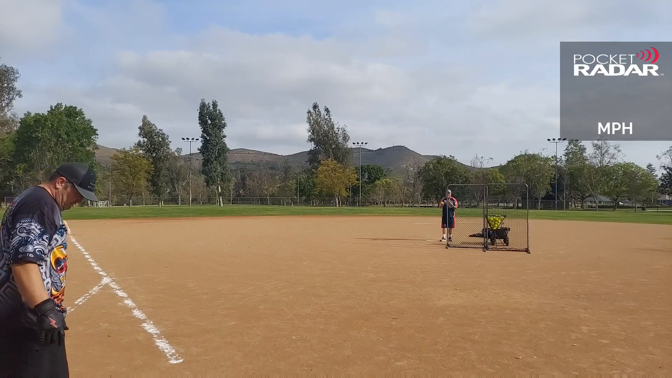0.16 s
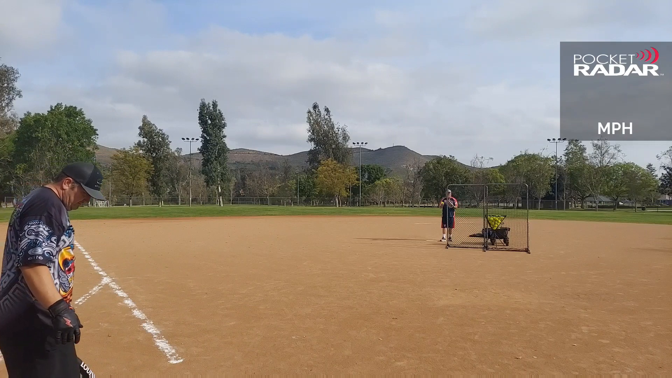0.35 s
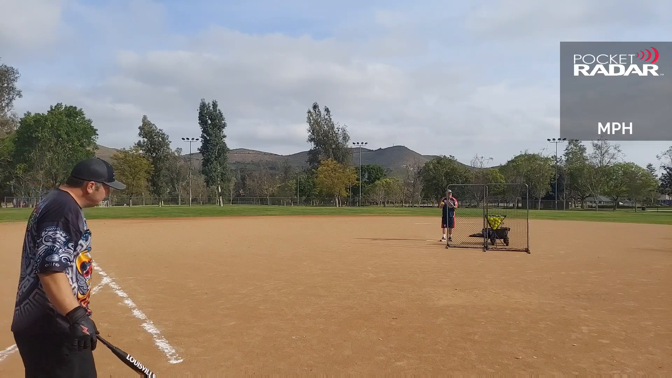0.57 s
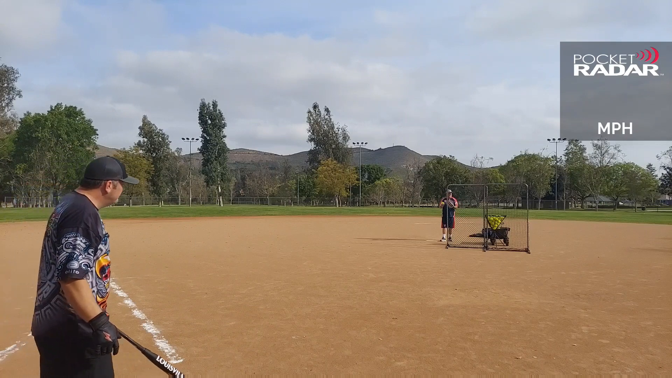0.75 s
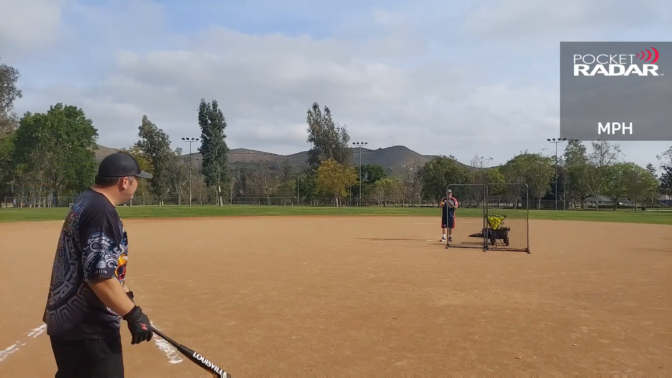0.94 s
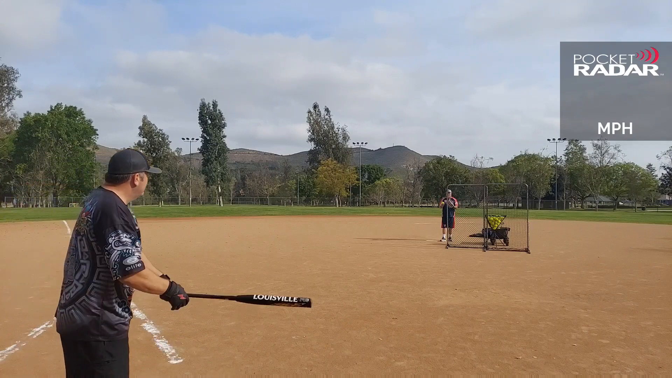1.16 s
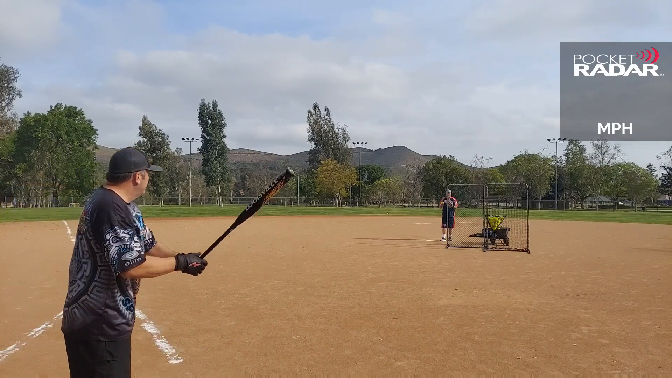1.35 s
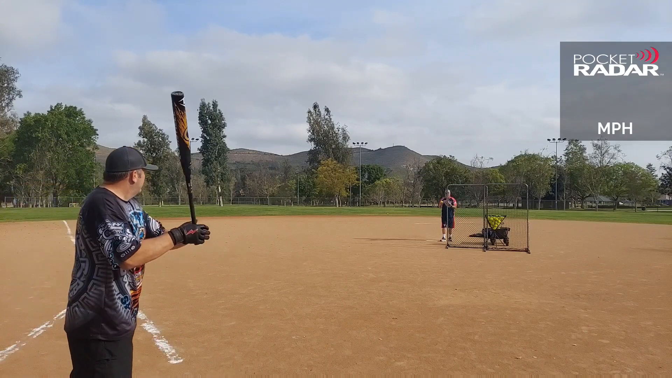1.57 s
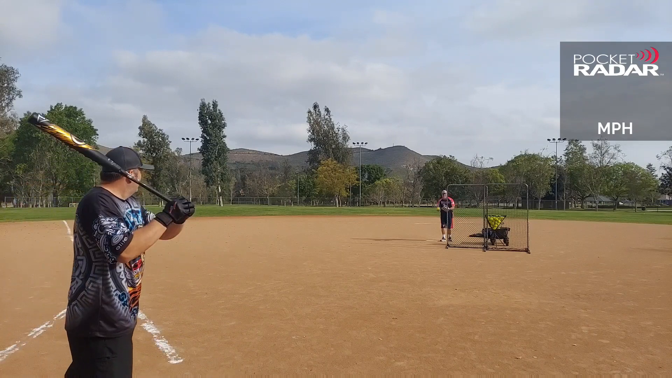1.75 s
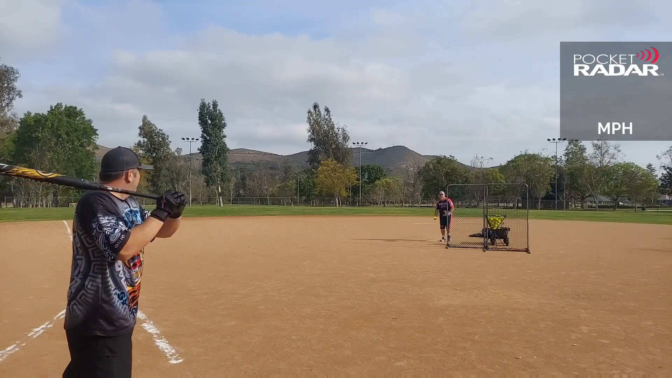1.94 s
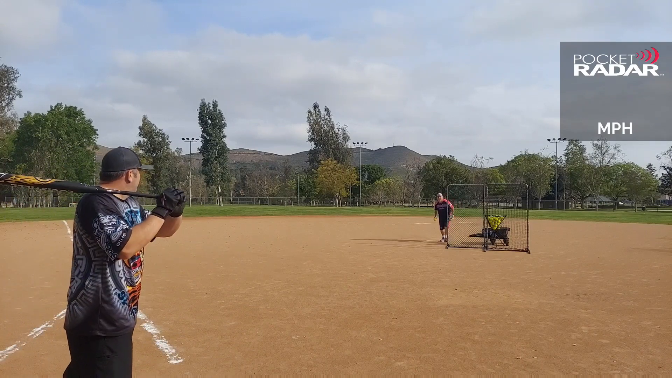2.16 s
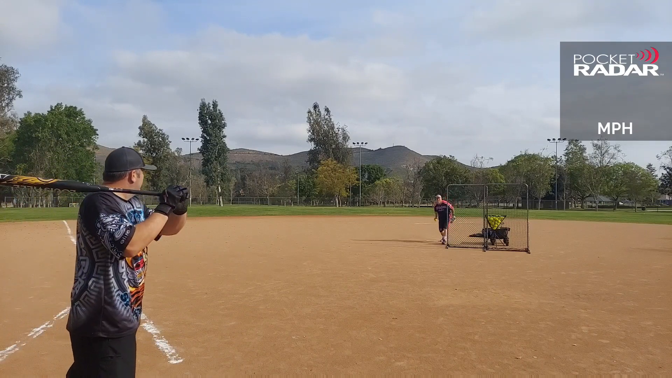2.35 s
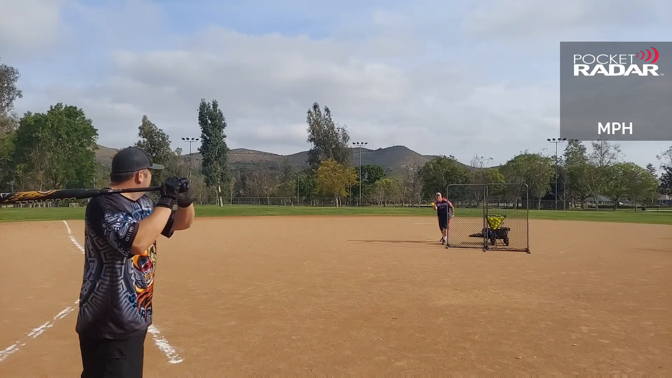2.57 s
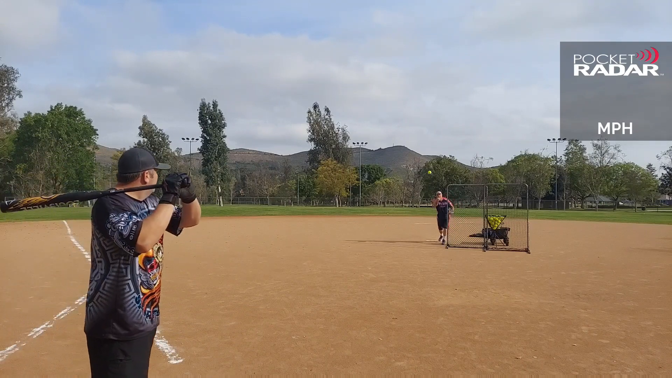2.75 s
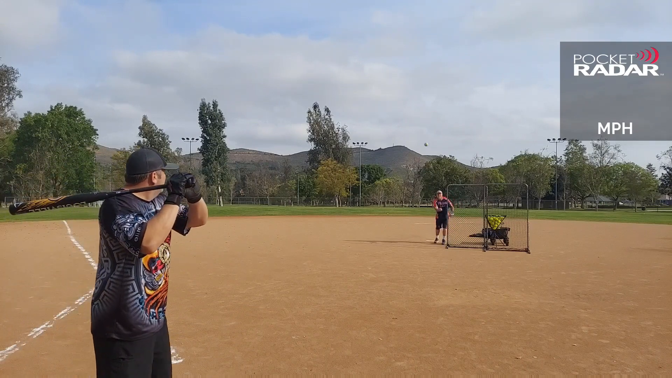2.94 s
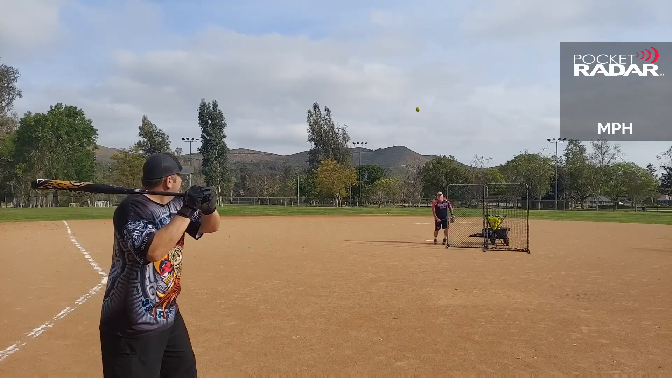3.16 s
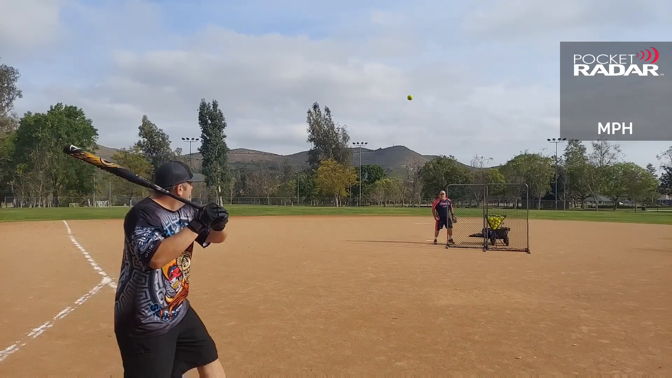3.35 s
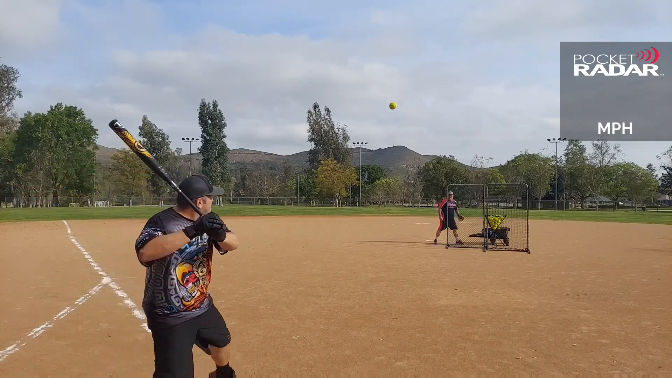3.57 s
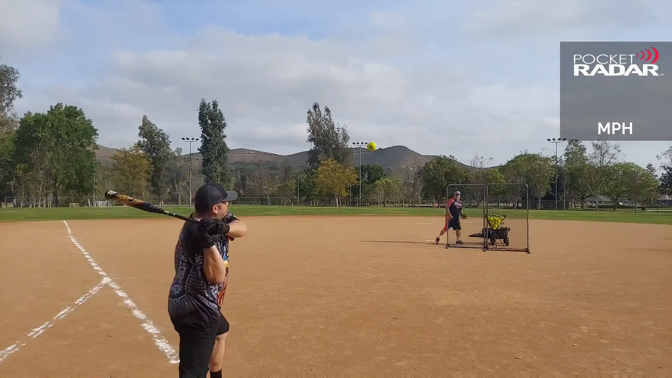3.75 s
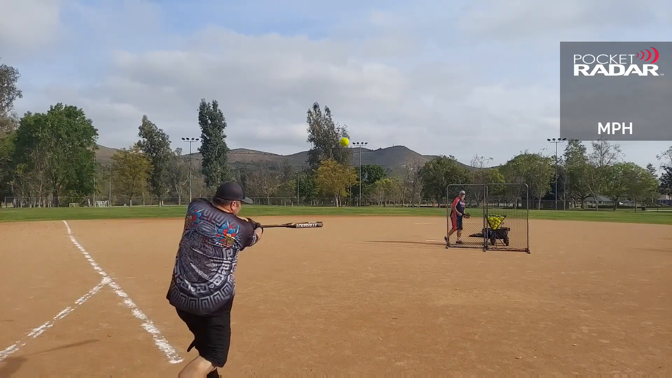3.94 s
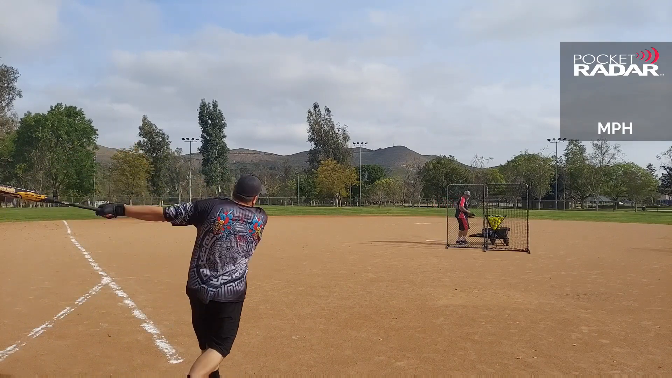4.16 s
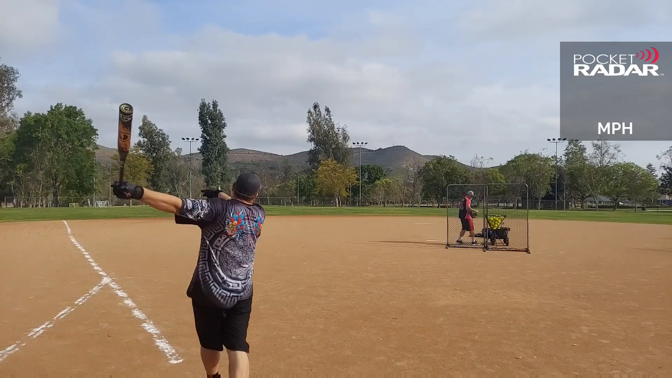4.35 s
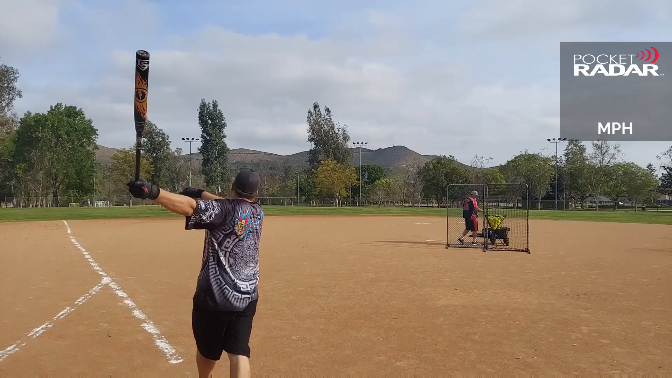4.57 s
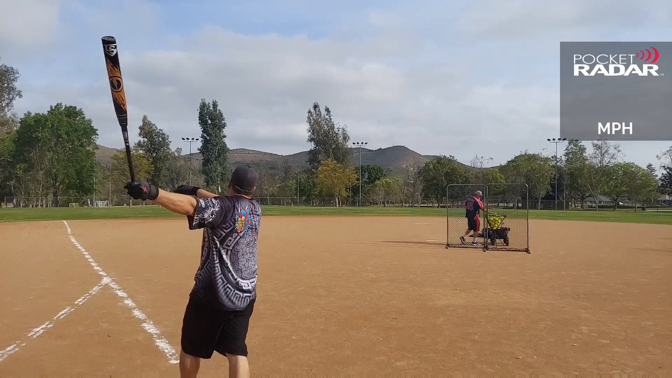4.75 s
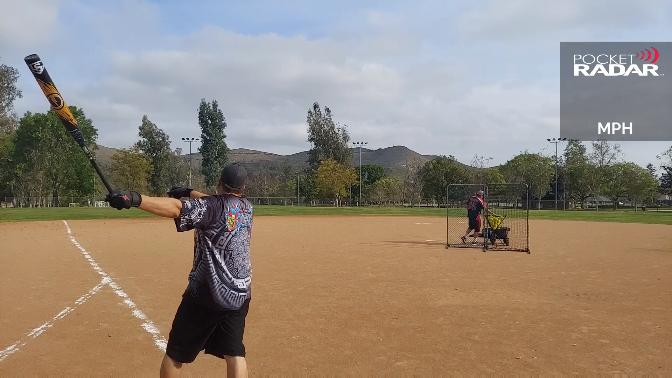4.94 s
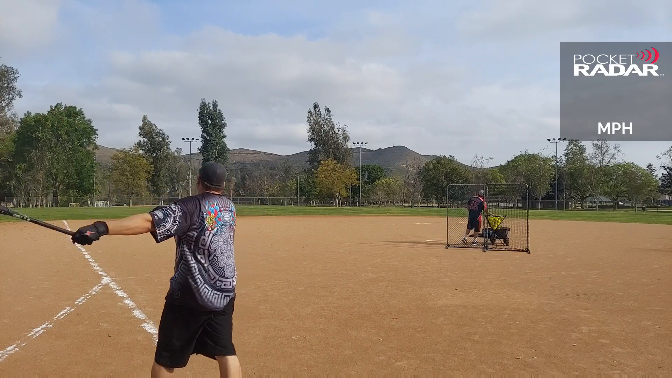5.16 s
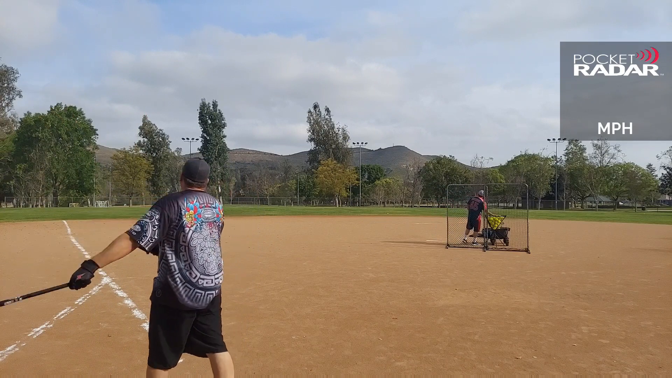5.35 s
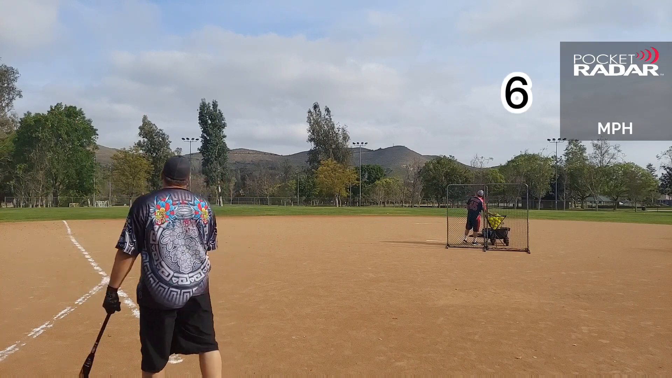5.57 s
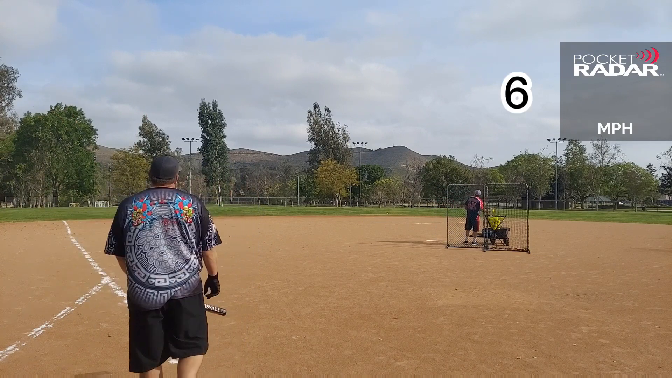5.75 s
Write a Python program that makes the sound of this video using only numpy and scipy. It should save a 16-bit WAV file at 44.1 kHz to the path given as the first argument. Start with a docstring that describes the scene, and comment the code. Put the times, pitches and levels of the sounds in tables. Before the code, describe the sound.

Quiet open field with gusty rumble and a chirping bird, then shoe scrape, bat swish, a hard crack echoing off trees, and gritty crunch.

```python
"""Batting practice on an open dirt softball field, heard from a few metres behind the plate.
From the start a gusty low rumble, far traffic wash and drone (noise), and a trilling small bird (sines).
About 3.5 s the front shoe scrapes (grainy noise), grit clicks, and the bat swishes (swelling noise).
At 3.98 s one sharp crack and a ringing barrel (damped sines) come back off backstop, fences and trees.
The back shoe crunches round at 4.3 s; from 5.2 s the feet shuffle faintly, over a quieter rumble."""
import sys
import numpy as np
from scipy import signal
from scipy.fft import rfft
from scipy.io import wavfile
from scipy.ndimage import uniform_filter1d

SR = 44100
rng = np.random.default_rng(int(sys.argv[2]) if len(sys.argv) > 2 else 0)


def to_wav(s):
    """Save 16-bit WAV."""
    ch = np.atleast_2d(s).T  # columns
    pcm = np.round(np.clip(ch, -1, 1) * 32767)  # PCM
    wavfile.write(sys.argv[1], SR, pcm.astype(np.int16))


N = 255952
T = np.arange(N) / SR
HIT_S = 3.9779


def undb(db):
    """Decibels to gain."""
    return 10 ** (np.asarray(db) / 20)


def unit(x):
    """Scale to rms 1."""
    return x / np.sqrt(np.mean(x ** 2))


def curve(rows):
    """Join (t/s, value) rows by straight lines."""
    return np.interp(T, *np.transpose(rows))


def fade(start_s, t60_s):
    """Silence until start, then an exponential decay."""
    decay_db = -60 * np.clip((T - start_s) / t60_s, 0, 4)
    return (T >= start_s) * undb(decay_db)


def swells(rows):
    """Power sum of swells that climb and die by 20 dB in their rise and fall times."""
    power = 0
    for peak_s, db, rise_s, fall_s in rows:
        away = np.maximum((peak_s - T) / rise_s, (T - peak_s) / fall_s)
        power = power + undb(db - 20 * np.minimum(away, 10)) ** 2
    return np.sqrt(power)


def walk(rate_hz):
    """Smooth random wandering, rms 1: random steps averaged twice."""
    size = max(int(SR / rate_hz), 2)
    steps = np.repeat(rng.standard_normal(N // size + 1), size)[:N]
    return unit(uniform_filter1d(uniform_filter1d(steps, size), size))


def colour(x, points, tilt_db_per_oct=0):
    """Filter x by (f/Hz, dB) points with 36 dB/octave skirts and a tilt; rms 1."""
    octave = np.log2(np.maximum(np.fft.rfftfreq(N, 1 / SR), 1))
    hz, db = np.transpose(points)
    knots = np.log2(hz)
    outside = np.maximum(knots[0] - octave, 0) + np.maximum(octave - knots[-1], 0)
    tilt_db = tilt_db_per_oct * (octave - knots.mean())
    gain_db = np.interp(octave, knots, db) + tilt_db - 36 * outside
    return unit(np.fft.irfft(rfft(x) * undb(gain_db), N))


def noise(points):
    """Gaussian noise of a given spectrum, rms 1."""
    return colour(rng.standard_normal(N), points)


def filtered(x, order, corner_hz, kind):
    """Butterworth filter; the tiny offset keeps its state off denormal numbers."""
    sos = signal.butter(order, corner_hz, kind, fs=SR, output="sos")
    return signal.sosfilt(sos, x + 1e-18)


def ring(modes, start_s):
    """Damped sines of (f/Hz, level/dB, t60/s) modes, all struck at start."""
    age = T[:SR]
    tone = np.zeros(SR)
    for hz, db, t60_s in modes:
        tone += undb(db - 60 * age / t60_s) * np.sin(2 * np.pi * hz * age)
    return np.interp(T - start_s, age, tone, left=0, right=0)


def delayed(x, delay_s):
    """The same sound, arriving later."""
    return np.interp(T - delay_s, T, x)


def scatter(x, t60_s):
    """Countless faint echoes off trees and fences: convolution with decaying noise."""
    echoes = rng.standard_normal(SR) * fade(0, t60_s)[:SR]
    return signal.fftconvolve(x, echoes / np.linalg.norm(echoes))[:N]


# barrel and ball pressed together, heavily damped: f/Hz, relative level/dB, t60/s
CRACK_MODES = [(328, -26, 0.022), (625, -20.5, 0.01443), (1143, -14.5, 0.04), (1380, -7.5, 0.0092),
               (1630, 0.5, 0.0088), (1850, -8.5, 0.022), (3250, -8, 0.014), (3600, -10.5, 0.01),
               (3946, -9.5, .014), (5360, -7, 0.0078), (5730, -8.5, 0.0086), (6110, -18.5, 0.012),
               (6200, -24, 0.0068)]
# close echoes off dirt and backstop: delay/s, level re direct/dB
CLOSE_PATHS = [(.0029, 1), (0.017, -20), (0.0233, -14), (0.0265, -17.5)]


def crack(crack_db=-5, radiate_hz=480, dull_hz=5500):
    """The blow: damped modes radiating little bass from so small a body, plus duller close echoes."""
    # negative: the wall is first pushed inwards
    direct = filtered(-ring(CRACK_MODES, HIT_S), 2, radiate_hz, "high")
    dull = filtered(direct, 1, dull_hz, "low")  # every surface takes off some treble
    echoes = sum(undb(db) * delayed(dull, delay_s) for delay_s, db in CLOSE_PATHS)
    return undb(crack_db) * (direct + echoes)


# barrel ringing freely after the ball has left: f/Hz, relative level/dB, t60/s
BARREL_MODES = [(872, -42, .25), (1048, -26, .18), (1157, -19, .24), (1194, -32, .34), (1267, -18.5, .24),
                (1316, -26, .16), (1399, -36, .22), (1548, -26.5, .17), (1790, -30, .17), (1867, -28, .18),
                (1920, -27.5, .2), (2005, -29, .16), (2090, -34, .2), (2306, -25, .13), (2804, -35, .16),
                (2961, -44, .25), (3048, -31, .13), (3259, -28, .16), (3351, -30, .15), (4050, -37.5, .15),
                (4120, -37.5, .15), (4240, -40, .14), (4820, -45, .14), (4985, -43, .17), (5335, -37, .14),
                (5470, -39, .14), (6487, -43, .14)]
# the follow-through carries the barrel behind the batter
SHADE_S, SHADE_EDGE_S, SHADE_DB = 0.037, 0.005, -12.5


def bat_hit(barrel_db=3.5, release_s=0.009):
    """Crack plus barrel ring, which swells as the ball lets go and drops behind the batter."""
    release = 1 - np.exp(-np.maximum(T - HIT_S, 0) / release_s)
    shaded = .5 * (1 + np.tanh((T - HIT_S - SHADE_S) / SHADE_EDGE_S))
    barrel = release * undb(SHADE_DB * shaded) * ring(BARREL_MODES, HIT_S)
    return crack() - undb(barrel_db) * barrel


# fences and trees returning the whole hit: delay/s, level/dB, pitch ratio
FIELD_ECHOES = [(0.035, -21.5, 1.0), (0.045, -20, 1.025), (.059, -21, .995), (0.075, -33, 1.3),
                (.093, -24.5, .98), (.106, -26, 1.015), (.124, -27.5, .985), (.146, -30.5, 0.78),
                (.181, -34.5, 0.91), (.211, -35, .97)]
# diffuse return: f/Hz, relative density/dB per Hz
LEAF_SPECTRUM = [(88, -42), (150, -25.5), (210, -18.5), (246, -13), (392, -13), (468, -9), (733, -18.5),
                 (1170, -5.5), (1410, -14), (1950, -3), (2180, -16.5), (2650, -13.5), (2950, -12.5),
                 (4770, -19.5), (5600, -23.5), (6900, -32), (8970, -57)]


def field_return(hit, low_hz=700, high_hz=4200, echo_t60_s=0.0082, trees_db=-20, trees_s=0.06,
                 trees_t60_s=0.49, leaves_db=-35, leaves_t60_s=0.6, build_s=0.03):
    """Smeared separate echoes of the hit, long scatter in the trees, and a rustle of finer returns."""
    # mesh and foliage soak up both the bass and the treble
    thrown = filtered(hit, 2, [low_hz, high_hz], "band")
    echoes = np.zeros(N)
    for delay_s, db, ratio in FIELD_ECHOES:
        shifted = np.interp(HIT_S + (T - HIT_S) * ratio, T, thrown)
        echoes += undb(db) * delayed(scatter(shifted, echo_t60_s), delay_s)
    trees = undb(trees_db) * delayed(scatter(thrown, trees_t60_s), trees_s)
    build = 1 - np.exp(-np.maximum(T - HIT_S, 0) / build_s)
    leaf_envelope = build * fade(HIT_S + 0.02, leaves_t60_s)
    leaves = undb(leaves_db + 1.9 * walk(150)) * leaf_envelope * noise(LEAF_SPECTRUM)
    return echoes + trees + leaves


# passing bat, blow, rebound, landing foot: t/s, level/dB, f/Hz, t60/s
THUMP_ROWS = [(3.944, -37.5, 135, 0.097), (3.976, -38.5, 105, 0.049), (3.9978, -24, 270, 0.017),
              (4.417, -41, 125, 0.074)]


def thumps(onset_t60_s=0.012):
    """Dull pushes of air and ground: soft-edged damped low sines."""
    out = np.zeros(N)
    for start_s, db, hz, t60_s in THUMP_ROWS:
        out += (1 - fade(start_s, onset_t60_s)) * ring([(hz, db, t60_s)], start_s)
    return out


# air rushing round the bat: peak t/s, level/dB, rise/s, fall/s (over 20 dB)
SWING_SWELLS = [(3.868, -45.5, 0.097, .05), (3.897, -39, 0.081, 0.0221), (3.975, -48, 0.075, .012)]
# f/Hz, relative density/dB per Hz
SWISH_SPECTRUM = [(120, -30.5), (200, -11.5), (654, -4), (793, -2.5), (1390, -5.5), (1930, -13.5),
                  (2080, -11.5), (2270, -12.5), (5440, -13.5), (6900, -17.5), (8970, -50), (15200, -120)]


def swing(flutter_db=1.5):
    """Turbulent air round the bat, loudest as it sweeps past the microphone."""
    return swells(SWING_SWELLS) * undb(flutter_db * walk(200)) * noise(SWISH_SPECTRUM)


# dirt under a sole: f/Hz, relative density/dB per Hz
DIRT_SPECTRUM = [(200, -11.5), (450, -16.5), (750, -14.5), (1020, -3.5), (1350, -7), (1650, -4.5),
                 (1950, -2.5), (2600, -9.5), (3400, -12), (4200, -15), (5400, -14.5), (6300, -23)]


def scuff(slips, tilt_db_per_oct, grain_db):
    """A sole dragged over dirt: noise of uneven grains that catches and slips."""
    grains = rng.standard_normal(N) * undb(grain_db * walk(900) + 1.9 * walk(110))
    return swells(slips) * colour(grains, DIRT_SPECTRUM, tilt_db_per_oct)


def grit(slips, grit_db, tilt_db_per_oct, grains_per_s=260, spread_db=28):
    """Single grains of sand cracking under the sole: random impulses, a few much louder."""
    struck = rng.random(N) < grains_per_s / SR
    cracks = struck * rng.choice([-1, 1], N) * undb(spread_db * rng.random(N))
    return undb(grit_db) * swells(slips) * colour(cracks, DIRT_SPECTRUM, tilt_db_per_oct)


# all three: peak t/s, relative level/dB, rise/s, fall/s (over 20 dB)
# front shoe sliding forward
STRIDE_SLIPS = [(3.468, -59.5, 0.044, .05), (3.495, -52.5, 0.064, 0.073), (3.53, -51, 0.053, 0.05),
                (3.56, -56.5, .02, 0.22), (3.67, -55, 0.11, .1), (3.755, -53.5, .1, 0.093),
                (3.795, -49, 0.074, 0.15)]
# back shoe turning after the swing
PIVOT_SLIPS = [(4.327, -38.5, 0.0089, 0.035), (4.336, -38.5, .008, 0.022), (4.346, -38, 0.011, 0.017),
               (4.362, -47.5, 0.014, 0.077), (4.395, -51.5, 0.058, 0.083), (4.414, -51, 0.014, 0.043),
               (4.44, -53, 0.041, 0.077), (4.515, -59, 0.092, 0.19)]
# feet settling afterwards
SHUFFLE_SLIPS = [(5.16, -63, 0.14, 0.4), (5.34, -62.5, 0.26, 0.21), (5.56, -68.5, .12, 0.16)]


def shoes(slide_db=-1.5, turn_db=-1.0):
    """Soles on dirt: a bright crackling slide, a heavier crunch, then a faint shuffle."""
    slide = undb(slide_db) * scuff(STRIDE_SLIPS, tilt_db_per_oct=3.5, grain_db=0.0)
    slide += grit(STRIDE_SLIPS, grit_db=-7.5, tilt_db_per_oct=5.5)
    turn = undb(turn_db) * scuff(PIVOT_SLIPS, tilt_db_per_oct=-1.0, grain_db=1.0)
    turn += grit(PIVOT_SLIPS, grit_db=-10.0, tilt_db_per_oct=-5.5)
    settle = scuff(SHUFFLE_SLIPS, tilt_db_per_oct=-9.5, grain_db=4.0)
    return slide + turn + settle


# grit and gear: t/s, peak level/dB, centre f/Hz, t60/s
CLICK_ROWS = [(3.193, -42, 750, 0.016), (3.467, -51, 5050, .006), (3.529, -50, 3500, 0.011),
              (3.556, -43, 4500, 0.0088), (3.668, -50, 3600, .008), (3.8028, -31.5, 2970, 0.005),
              (3.805, -34.5, 4300, 0.01), (3.865, -42, 4200, .008), (4.336, -38, 2110, 0.011),
              (4.413, -40, 1480, 0.011), (4.4398, -41, 1560, 0.012), (4.48, -46.5, 1800, .008),
              (4.571, -51, 1400, .02), (4.632, -61.5, 4500, .006), (5.333, -41.5, 1640, 0.011),
              (5.575, -63, 3400, .006)]


def clicks(band_ratio=1.34):
    """Small knocks of grit and gear: brief decaying noise, each in its own broad band."""
    out = np.zeros(N)
    for start_s, db, hz, t60_s in CLICK_ROWS:
        source = rng.standard_normal(N) * fade(start_s, t60_s)
        burst = filtered(source, 3, [hz / band_ratio, hz * band_ratio], "band")
        out += undb(db) * burst / np.abs(burst).max()
    return out


# notes: t/s, length/s, first f/Hz, last f/Hz, relative level/dB, rasp/0-1
BIRD_NOTES = [ (0.161, 0.043, 4450, 5210, -64.5, 0.74), (0.18, 0.037, 5100, 4580, -56.5, 0.96),
              (0.209, 0.066, 3950, 3540, -52, 0.22), (0.271, 0.076, 3520, 3430, -58.5, 0.04),
              (1.208, 0.075, 5770, 5620, -68, 0.2), (1.28, 0.08, 5730, 5800, -71.5, 0.1),
              (1.334, 0.027, 5070, 4400, -61, 0.84), (1.357, .05, 4180, 3950, -54, 0.08),
              (1.395, 0.074, 3920, 3797, -51.5, 0.13), (1.47, 0.115, 3880, 3940, -70.5, 0.2),
              (1.591, .038, 3970, 4070, -57.5, 0.1), (1.635, 0.066, 4200, 4060, -59, 0.08),
              (1.687, 0.08, 4110, 3900, -58, 0.25), (1.675, .07, 4270, 4100, -65, 0),
              (1.758, 0.09, 4000, 3990, -64, 0.3), (1.923, 0.13, 6360, 6180, -84.5, 0),
              (2.02, 0.12, 6300, 6640, -78.5, 0.17), (2.81, 0.061, 4160, 4660, -61, 0.18),
              (2.856, 0.056, 6980, 5550, -61, 0.7), (2.9, 0.028, 5930, 5730, -58, 1),
              (2.942, 0.23, 3786, 3746, -56.5, 0.13), (4.893, 0.056, 3700, 3730, -70, 0.28),
              (4.94, 0.087, 3430, 3320, -66.5, 0.12), (5.255, 0.06, 3480, 3720, -78, 0.3),
              (5.791, 0.071, 3880, 3770, -68, 0.16)]
NOTE_SETTLE = 3.6  # pitch-slide time constants per note
NOTE_ATTACK_S, NOTE_RELEASE_S, TRILL_HZ = 0.0072, 0.011, 89


def bird(rasp_depth=0.072, flutter_db=2.5, trill_db=5.5, song_db=-4, wet_db=-8.0, trees_t60_s=0.41):
    """Sines that slide and settle, trilled and raspy as the throat shakes; the trees smear them."""
    song = np.zeros(N)
    shake, flutter = rasp_depth * walk(850), flutter_db * walk(60)
    trill = trill_db * np.sin(2 * np.pi * TRILL_HZ * T + walk(30))
    for start_s, length_s, first_hz, last_hz, db, rasp in BIRD_NOTES:
        on = (T >= start_s) & (T < start_s + length_s)
        age = T[on] - start_s
        slide = np.expm1(-NOTE_SETTLE * age / length_s) / np.expm1(-NOTE_SETTLE)
        pitch_hz = (first_hz + (last_hz - first_hz) * slide) * (1 + rasp * shake[on])
        envelope = np.minimum(np.minimum(age / NOTE_ATTACK_S, (length_s - age) / NOTE_RELEASE_S), 1)
        level = undb(db + flutter[on] + min(rasp, .5) * trill[on])
        tone = np.sqrt(2) * np.sin(2 * np.pi * np.cumsum(pitch_hz) / SR)
        song[on] += envelope * level * tone
    return undb(song_db) * song + undb(wet_db) * scatter(song, trees_t60_s)


# background rumble, lower after the hit: t/s, relative level/dB
RUMBLE_LEVEL = [(0, -47.5), (.65, -46.5), (.92, -47), (1.65, -45.5), (2.4, -48), (3.5, -55.5), (3.95, -53),
                (4.25, -60.5), (4.9, -60.5), (5.2, -60.5), (5.8, -57.5)]
# stronger gusts: peak t/s, relative level/dB, length/s (two standard deviations)
GUST_ROWS = [(0.29, -44, 0.061), (0.54, -41.5, 0.047), (0.708, -44.5, 0.054), (1.597, -39, 0.032),
             (1.847, -42, 0.036), (2.793, -46, 0.035), (2.983, -46.5, 0.042), (3.178, -45, 0.078),
             (3.536, -52.5, 0.053), (3.784, -47.5, 0.085), (3.894, -47, 0.091), (4.337, -56, 0.071),
             (4.437, -54.5, 0.044), (5.083, -53, 0.049), (5.162, -52.5, 0.05), (5.412, -51.5, 0.1),
             (5.724, -55, 0.1)]


def rumble_strength(buffet_db=1.54, buffet_per_s=16):
    """A restless rumble level with bell-shaped gusts added in power."""
    base = undb(curve(RUMBLE_LEVEL) + buffet_db * walk(buffet_per_s))
    power = base ** 2
    for peak_s, db, length_s in GUST_ROWS:
        gust = undb(db) * np.exp(-.5 * (2 * (T - peak_s) / length_s) ** 2)
        power = power + gust ** 2
    return np.sqrt(power)


# buffeting: f/Hz, relative density/dB per Hz
RUMBLE_SPECTRUM = [(25, -20), (38, -13), (52, 2), (80, 0.5), (125, 1.5), (165, -4.5), (208, -1.5),
                   (250, -7), (330, -12)]


def rumble(rumble_db=-0.5):
    """Low buffeting at the microphone: noise levelled, then driven by base level and gusts."""
    eddies = noise(RUMBLE_SPECTRUM)
    eddies = eddies / np.sqrt(uniform_filter1d(eddies ** 2, size=3500))  # window in samples
    return undb(rumble_db) * rumble_strength() * eddies


# far traffic and trees: t/s, level/dB
WASH_LEVEL = [(0, -48), (.88, -45.5), (1.3, -50), (1.85, -49.5), (2.2, -53), (2.6, -51.5), (3.25, -54),
              (4.85, -66), (5.35, -65), (5.8, -65)]
# f/Hz, relative density/dB per Hz
WASH_SPECTRUM = [(200, -26.5), (330, -7), (480, -1.5), (650, -1), (1000, 0), (1400, -2.5), (1900, -6.5),
                 (2600, -15), (3500, -21.5), (5000, -35), (6800, -45)]
# low traffic drone: t/s, level/dB
DRONE_LEVEL = [(0, -50), (.72, -45.5), (1.1, -56.5), (1.7, -50), (2.3, -64), (3.3, -60), (4.8, -69),
               (5.8, -69)]
# f/Hz, relative density/dB per Hz
DRONE_SPECTRUM = [(170, -12), (210, 0.5), (245, -2), (290, -11.5)]


def distance(waver_db=1.1):
    """Far traffic and trees: a wavering noise wash over a narrow low drone."""
    wash = undb(curve(WASH_LEVEL) + waver_db * walk(14)) * noise(WASH_SPECTRUM)
    drone = undb(curve(DRONE_LEVEL)) * noise(DRONE_SPECTRUM)
    return wash + drone


# microphone: f/Hz, relative density/dB per Hz
HISS_SPECTRUM = [(2500, 8.5), (5500, -2.5), (6800, -5)]


def hiss(hiss_db=-84):
    """Steady noise of the microphone."""
    return undb(hiss_db) * noise(HISS_SPECTRUM)


def scene():
    """Everything at the one microphone."""
    hit = bat_hit()
    batter = hit + field_return(hit) + thumps() + swing() + shoes() + clicks()
    background = bird() + rumble() + distance() + hiss()
    return (batter + background)[None]


def record(dry, ceiling=0.5, top_hz=6800):
    """Soft saturation rounds the peaks; a steep low-pass cuts the treble."""
    rounded = ceiling * np.tanh(dry / ceiling)
    lowpass = signal.ellip(7, .2, 40, top_hz, fs=SR, output="sos")  # order, ripple dB, stopband dB
    return signal.sosfilt(lowpass, rounded)


dry = scene()
out = record(dry)
to_wav(out)
```